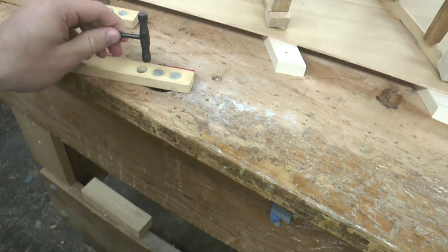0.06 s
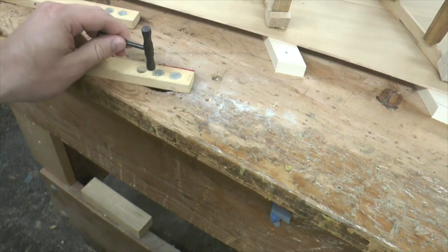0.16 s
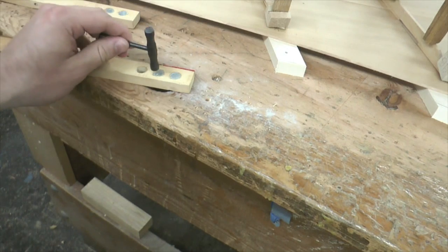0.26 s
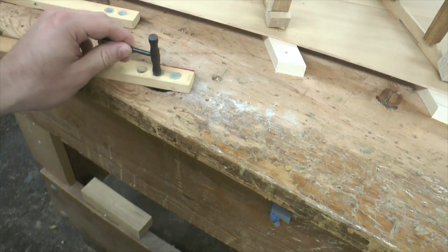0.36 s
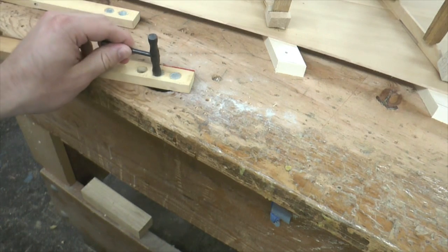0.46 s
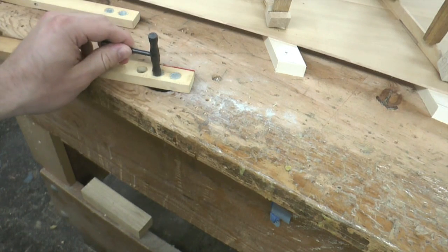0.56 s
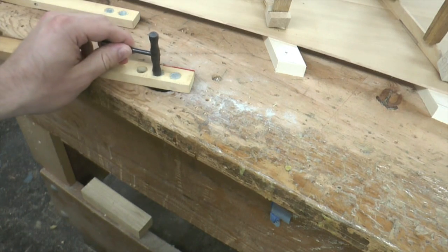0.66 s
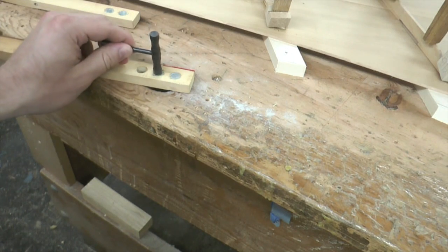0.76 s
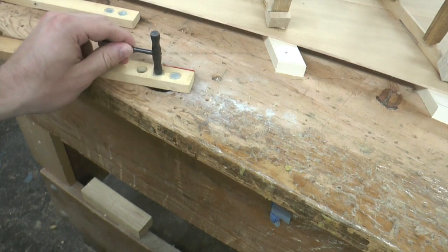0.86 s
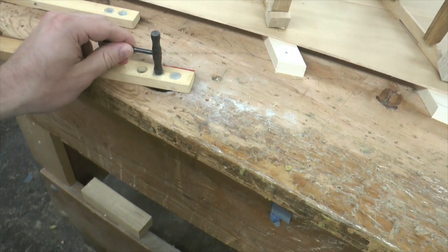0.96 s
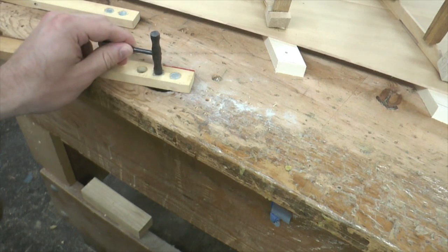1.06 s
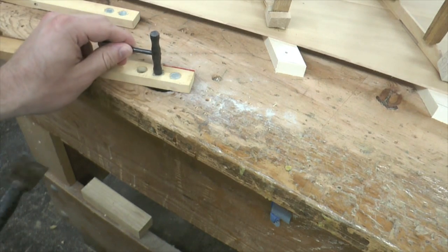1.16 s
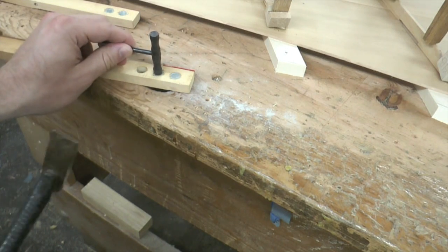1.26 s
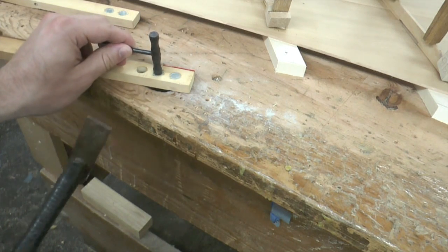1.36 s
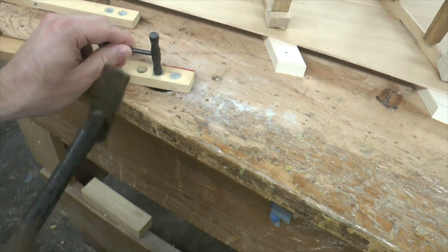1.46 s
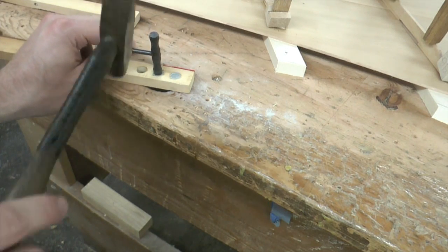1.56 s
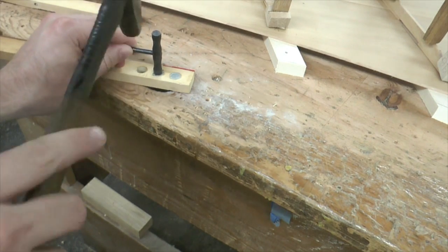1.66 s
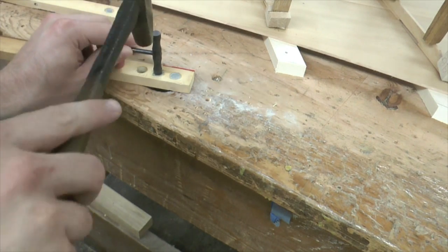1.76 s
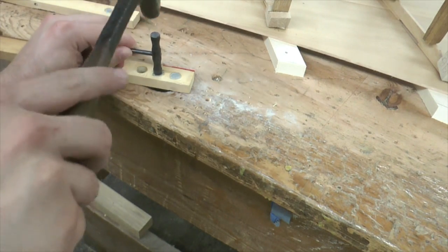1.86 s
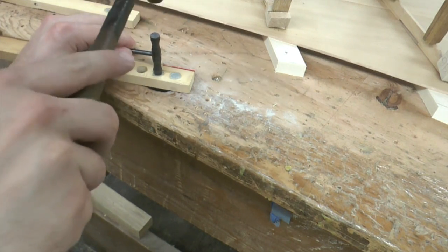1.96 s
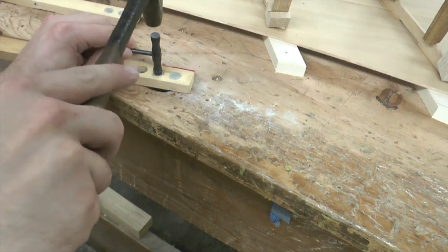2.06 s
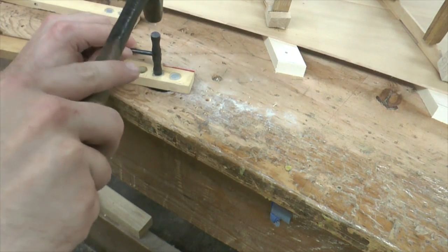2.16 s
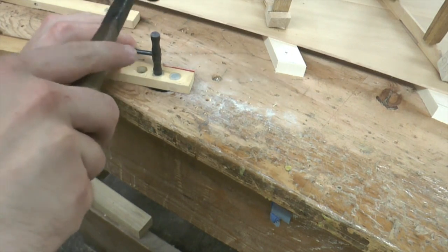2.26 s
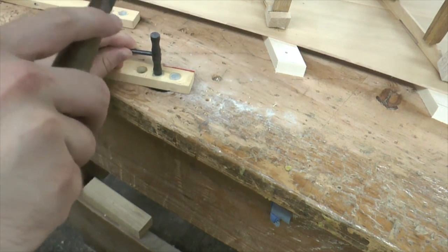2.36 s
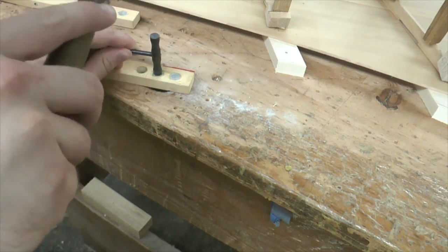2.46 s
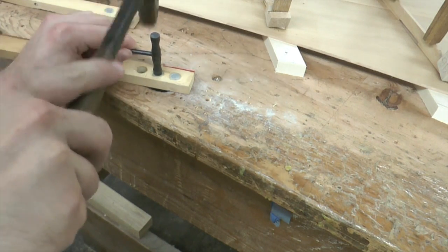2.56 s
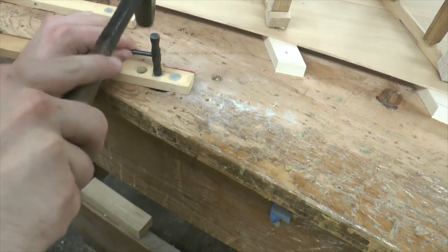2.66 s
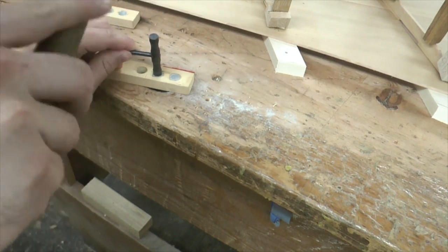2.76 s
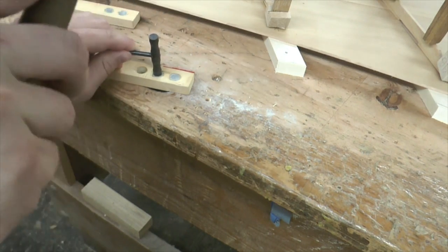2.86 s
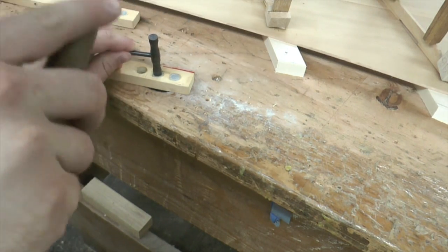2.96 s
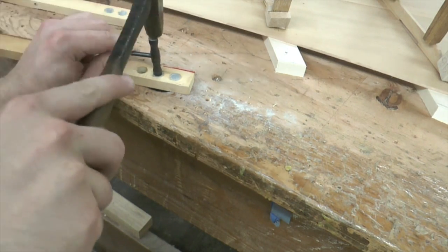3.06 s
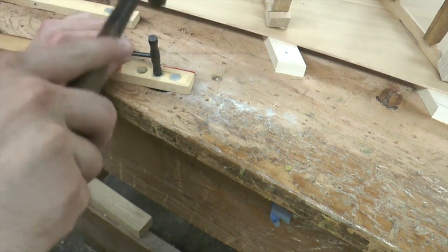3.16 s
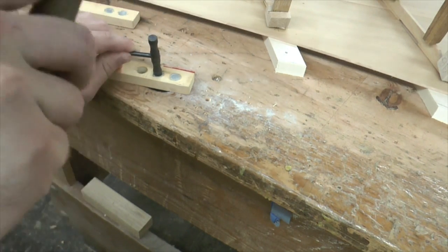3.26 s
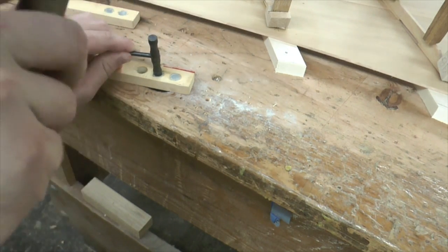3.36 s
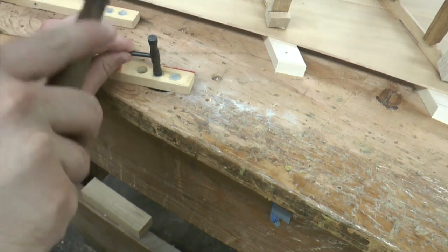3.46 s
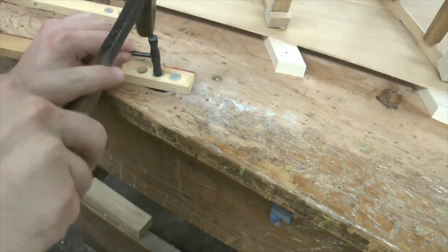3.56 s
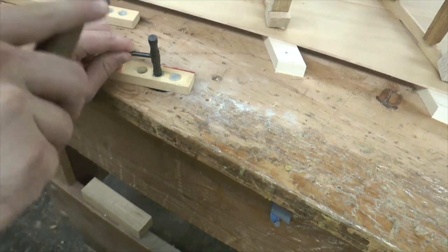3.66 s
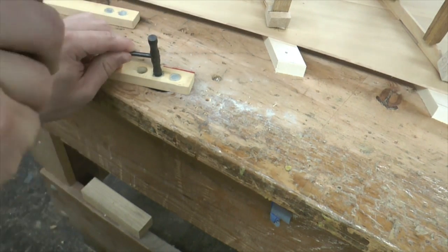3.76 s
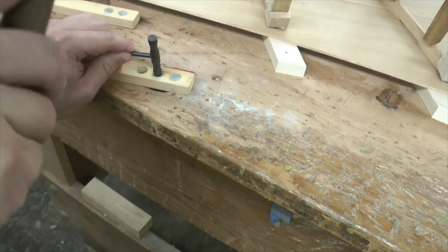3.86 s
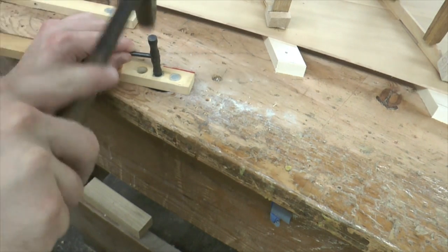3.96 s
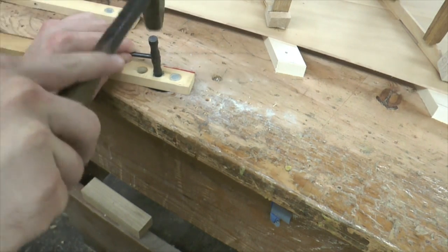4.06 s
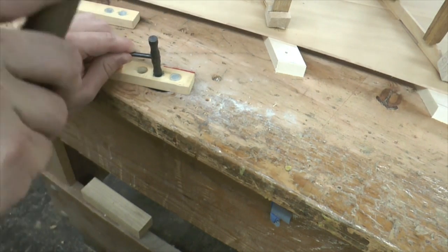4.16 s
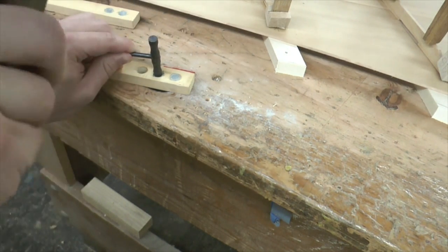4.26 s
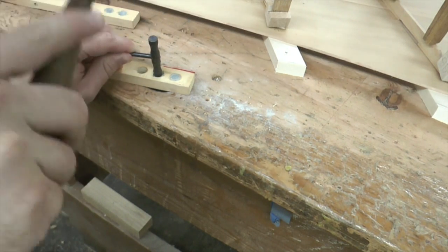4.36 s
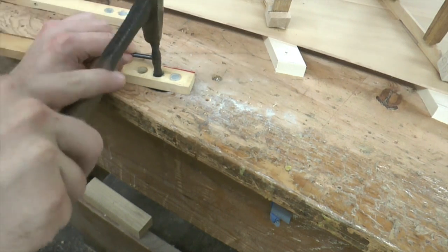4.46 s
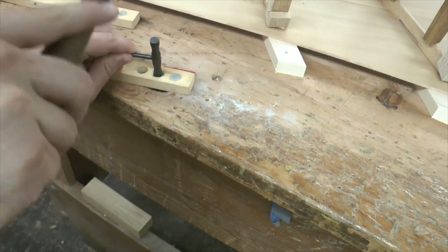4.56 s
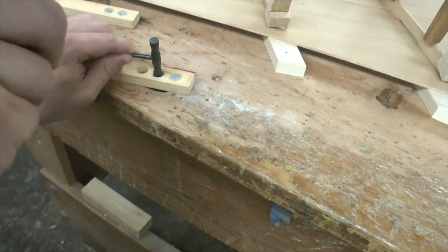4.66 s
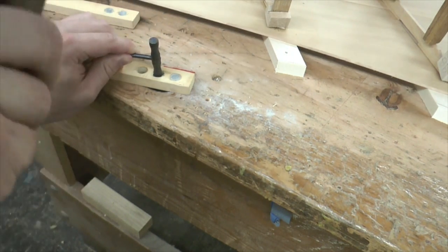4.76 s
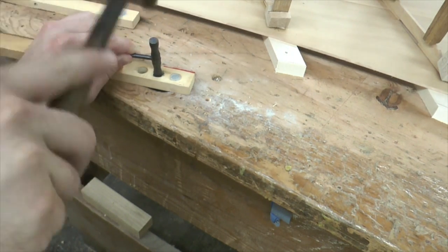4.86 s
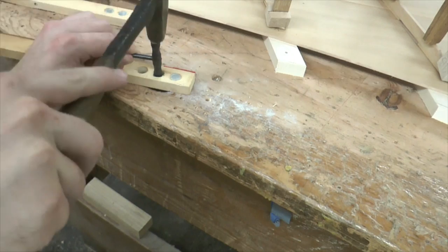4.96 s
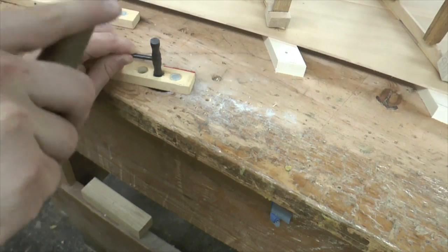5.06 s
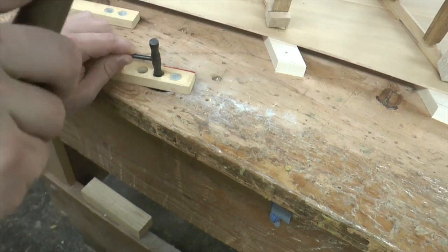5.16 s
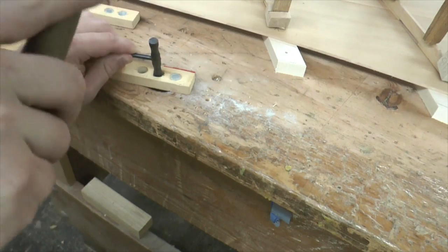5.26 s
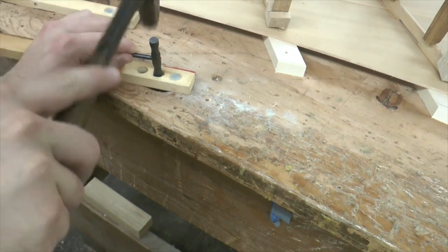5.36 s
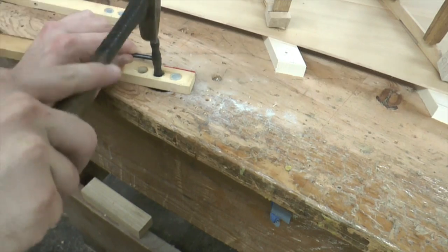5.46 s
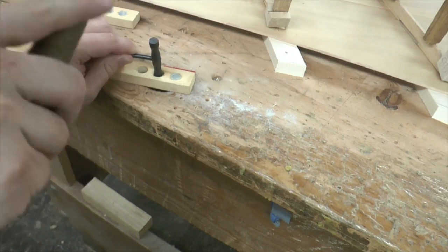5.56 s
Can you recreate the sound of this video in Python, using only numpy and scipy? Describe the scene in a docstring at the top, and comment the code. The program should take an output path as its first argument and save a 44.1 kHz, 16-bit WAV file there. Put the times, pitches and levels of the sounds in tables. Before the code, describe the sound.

Quiet handling comes first: small steel clicks, taps on wood and fingers sliding on a tool handle, above a faint electrical hum and hiss. Then come seven loud, steady hammer strikes on a metal punch held against wood on a bench. The first ones thud more and the later ones ring brighter. Each echoes in the small room and distorts the nearby microphone a little.

```python
"""In a small workshop, a steel punch is set on a lead weight in a wooden key and hammered seven times.
Light ticks, taps and rubs of handling come first, over faint mains hum and hiss. Each impact cracks,
excites the damped modes of punch, key and bench, and leaves the room ringing with standing waves
and diffuse reflections. The blows overload the close two-port camera microphone."""
import sys
import numpy as np
from scipy import signal
from scipy.fft import rfft, irfft
from scipy.io import wavfile
from scipy.ndimage import uniform_filter1d

SR = 44100
rng = np.random.default_rng(int(sys.argv[2]) if len(sys.argv) > 2 else 0)


def dump_mix(stems):
    """Bounce the given channels to the path in sys.argv[1] as a 16-bit WAV at rate SR."""
    frames = np.atleast_2d(stems).T  # one column per channel
    limited = np.clip(frames, -1, 1)  # hard clip at full scale
    pcm = np.round(limited * 32767).astype(np.int16)
    wavfile.write(sys.argv[1], SR, pcm)


N = 247842

# likeness of the two microphone ports in diffuse sound: frequency_hz, coherence
PORT_COHERENCE = [(100, 1), (1300, 1), (3100, 0.68), (6800, 0.5), (13000, 0)]
RIGHT_DB = -7  # gain of the whole right channel


def amp(db):
    """Amplitude ratio of a level in decibels."""
    return 10 ** (np.asarray(db) / 20)


def unit_rms(x):
    """Normalisation to an rms of 1."""
    return x / np.sqrt(np.mean(x ** 2) + 1e-20)


def curve_at(points, hz):
    """Interpolation of a table on a log-frequency axis."""
    table_hz, value = np.transpose(points)
    return np.interp(np.log(hz + 1), np.log(table_hz), value)


def bell(hz, centre_hz, octaves):
    """A Gaussian band on a log-frequency axis."""
    return np.exp(-.5 * (np.log2((hz + 1) / centre_hz) / octaves) ** 2)


def decay(t, t60_s):
    """Exponential damping: 60 dB lost in t60_s."""
    return np.exp(-np.log(1000) * t / t60_s)


def add(mix, start_s, sound):
    """Superposition of a sound on the two-channel mix."""
    part = mix[:, max(round(start_s * SR), 0):][:, :sound.shape[-1]]
    part += sound[..., :part.shape[1]]


def noise(length, gain, coherence=PORT_COHERENCE):
    """Partially coherent noise at the two ports, with spectrum gain(hz) and rms 1."""
    hz = np.fft.rfftfreq(length, 1 / SR)
    left, unrelated = rfft(rng.standard_normal((2, length)))
    alike = np.clip(curve_at(coherence, hz), -1, 1)
    right = alike * left + np.sqrt(1 - alike ** 2) * unrelated
    return unit_rms(irfft(np.array([left, right]) * gain(hz), length))


def minimum_phase(gain_db, size=4096):
    """The most compact causal pulse with spectrum gain_db(hz), by folding the cepstrum."""
    cepstrum = irfft(np.log(amp(gain_db(np.fft.rfftfreq(size, 1 / SR)))))
    cepstrum[1:size // 2] *= 2
    cepstrum[size // 2 + 1:] = 0
    return irfft(np.exp(rfft(cepstrum)))[:size // 2]


def ring(modes, t):
    """Free vibration as a sum of damped modes, neighbours in opposite phase."""
    return sum((-1) ** k * amp(db) * np.sin(2 * np.pi * hz * t) * decay(t, t60_s)
               for k, (hz, db, t60_s) in enumerate(modes))


def hiss(level_db=-66.5):
    """Stationary noise of still air and the microphone."""
    # noise floor spectrum: frequency_hz, relative_db
    spectrum = [(25, -12.5), (60, -23.5), (100, -8.5), (200, -7), (290, -8.5), (380, -3.5), (480, -10.5),
                (800, -12), (1280, -14), (2400, -15.5), (3100, -15.5), (4400, -18), (8000, -22.5),
                (16000, -27.5)]
    # likeness of the ports in that noise: frequency_hz, coherence
    coherence = [(60, .85), (600, .87), (1400, -0.084), (3100, -0.14), (7000, -0.21)]
    return amp(level_db) * noise(N, lambda hz: amp(curve_at(spectrum, hz)), coherence)


def hum(mains_hz=59.98, mains_db=-78, buzz_db=-80, db_per_octave=-2.5, whine_hz=960, waver_rad=0.16):
    """Mains hum and its even harmonics, wavering in phase, with one standing out as a whine."""
    # multiples of the mains in the buzz: harmonic_number
    harmonics = [12, 14, 16, 18, 28, 34, 46, 50, 54, 60, 74]
    t = np.arange(N) / SR
    knots_s = np.linspace(0, t[-1], num=N // 4096)
    lines_hz = mains_hz * np.array(harmonics)
    whine_db = 12 * bell(lines_hz, whine_hz, octaves=0.079)
    lines_db = buzz_db + db_per_octave * np.log2(lines_hz / whine_hz) + whine_db
    out = np.zeros(N)
    for hz, db in [(mains_hz, mains_db), *zip(lines_hz, lines_db)]:
        phase = np.interp(t, knots_s, waver_rad * rng.standard_normal(len(knots_s)))
        out += amp(db) * np.sqrt(2) * np.sin(2 * np.pi * hz * t + phase)
    return out


def reflections(size=512):
    """Diffuse reverberation: dense random echoes whose treble is absorbed soonest."""
    # spectrum of the diffuse field: frequency_hz, relative_db
    spectrum = [(50, -15), (100, 0), (200, 3), (350, 11), (550, 5.5), (850, 2), (1250, 5), (1900, -1),
                (2500, -5.5), (3100, -7), (3950, -10), (5600, -8.5), (9000, -12), (15000, -25.5)]
    # resonances of hammer and punch that linger in it: centre_hz, width_octaves, boost_db
    steel_resonances = [(1830, 0.072, 4), (3373, 0.065, 3.5)]
    # reverberation time: frequency_hz, t60_s
    reverb_times = [(100, 1.3), (300, 0.98), (800, 0.94), (1800, 0.96), (4000, 0.87), (7000, 0.74),
                    (11000, 0.55), (15000, 0.38)]

    def colour(hz):
        steel_db = sum(db * bell(hz, centre, octaves) for centre, octaves, db in steel_resonances)
        return amp(curve_at(spectrum, hz) + steel_db)

    hz, times, bands = signal.stft(noise(SR, colour), SR, nperseg=size)
    bands = bands * decay(times, curve_at(reverb_times, hz)[:, None])
    return signal.istft(bands, SR, nperseg=size)[1][:, :SR]


def room_response(walls, diffuse_db=-30, early_db=3, early_s=0.061, build_s=0.0024, standing_db=-1.0):
    """The workshop's impulse response: standing waves plus reflections, strongest at first."""
    # standing waves: pitch_hz, level_db, t60_s
    room_modes = [(83.8, -54.5, 4.1), (93.95, -61, 2.5), (140.1, -49, 1.4), (167.9, -47.5, 1.2),
                  (240.8, -40.5, 0.85), (266, -36.5, 0.7), (296.3, -36, 0.72), (299, -44, 0.25),
                  (313, -35, 0.62), (330.8, -42, 1.2), (357.6, -34, 0.97), (384, -39.5, 0.93),
                  (415, -38.5, 1), (450, -36.5, 0.92), (456, -34, 0.55), (553, -44.5, 0.35),
                  (571, -37.5, 0.7), (611.4, -35.5, 0.4), (618, -35, 0.76), (652, -44.5, 1.2),
                  (715, -45, 0.83), (743, -43, 0.39), (889, -44, 0.81), (869.7, -38, 0.55),
                  (1058, -40, 0.56), (1196, -44.5, .85), (1185, -46.5, 1.4), (1544, -45, 0.39),
                  (1750, -38.5, 0.3), (2008, -46, 0.78)]
    t = np.arange(SR) / SR
    fresh_share = .12  # the hands move, so this share of the reflected energy is new each time
    tail = np.sqrt(1 - fresh_share) * walls + np.sqrt(fresh_share) * reflections()
    diffuse = tail * amp(diffuse_db + early_db * np.exp(-t / early_s))
    build_up = 1 - np.exp(-(t / build_s) ** 2)
    return (diffuse + amp(standing_db) * ring(room_modes, t)) * build_up


def tick(centre_hz, octaves, t60_s):
    """A light impact: one band of noise, exponentially damped."""
    t = np.arange(SR // 4) / SR
    return noise(len(t), lambda hz: bell(hz, centre_hz, octaves)) * decay(t, t60_s)


def rub(length_s, centre_hz, octaves, grain_db=3):
    """Stick-slip friction: a swell of noise that flickers as skin catches and lets go."""
    t = np.arange(SR // 4) / SR
    swell = np.sin(np.pi * np.minimum(t / length_s, 1))
    grain = unit_rms(uniform_filter1d(rng.standard_normal(len(t)), size=120))
    return noise(len(t), lambda hz: bell(hz, centre_hz, octaves)) * swell * amp(grain_db * grain)


def handling(room, wet_db=-14, thump_wet_db=-22, tail_s=0.066, right_trim_db=-2.5):
    """Weak impacts and friction as the punch is seated, convolved with a shortened room response."""
    # steel ticks as the punch is placed and the hammer taken up: start_s, level_db, centre_hz
    steel_ticks = [(.198, -47.5, 7000), (.2051, -40.5, 6250), (.2997, -43, 5430), (.3025, -47.5, 2970),
                   (.538, -54, 3700), (1.997, -35.5, 7040), (2.0058, -39, 8500), (2.0624, -37, 3350),
                   (2.168, -54.5, 3400)]
    # taps on the wooden key: start_s, level_db
    key_taps = [(0.1762, -49), (1.703, -53), (2.062, -39.5), (2.096, -55.5)]
    # soft thumps on the bench top: start_s, level_db
    bench_thumps = [(.5435, -42.5), (1.281, -61), (2.064, -77)]
    # resonances a thump excites: centre_hz, width_octaves, relative_db, t60_s
    thump_bands = [(268, 0.76, 2, 0.18), (717, .33, -1.5, 0.19)]
    # skin sliding on a handle: start_s, length_s, level_db, centre_hz, width_octaves
    rubs = [(0.032, 0.18, -67, 960, 0.92), (1.235, 0.063, -67.5, 2500, 1.2), (1.749, 0.072, -60, 690, 1.8),
            (1.904, 0.15, -64.5, 600, 1.6)]
    touches, thumps = np.zeros((2, N)), np.zeros((2, N))
    for start_s, db, hz in steel_ticks:
        add(touches, start_s, amp(db) * tick(hz, octaves=0.85, t60_s=0.016))
    for start_s, db in key_taps:
        add(touches, start_s, amp(db) * tick(centre_hz=1390, octaves=0.26, t60_s=0.018))
    for start_s, db in bench_thumps:
        for hz, octaves, band_db, t60_s in thump_bands:
            add(thumps, start_s, amp(db + band_db) * tick(hz, octaves, t60_s))
    for start_s, length_s, db, hz, octaves in rubs:
        add(touches, start_s, amp(db) * rub(length_s, hz, octaves))
    short_room = room * np.exp(-np.arange(SR) / SR / tail_s)  # light touches have only a short echo
    into_room = amp(wet_db) * touches + amp(thump_wet_db) * thumps
    echo = signal.fftconvolve(into_room, short_room, axes=1)[:, :N]
    return (touches + thumps + echo) * amp([[0], [right_trim_db]])


def crack(peak_db=-2, swell_s=0.0007, scatter_db=-24, scatter_s=0.0078):
    """The impact transient of steel on steel, then its scattering off hand and bench top."""
    # spectrum of the transient: frequency_hz, relative_db
    spectrum = [(200, -4.5), (1000, 4), (3000, 4), (4100, 3), (6000, 10.5), (8200, -2.5), (10000, -1),
                (13500, -5), (15000, 2.5), (16000, -8)]
    t = np.arange(SR) / SR
    impact = amp(peak_db) * t / swell_s * np.exp(1 - t / swell_s)
    scatter = amp(scatter_db) * np.exp(-t / scatter_s)
    burst = noise(SR, lambda hz: amp(curve_at(spectrum, hz)), coherence=[(1000, 0.73), (12000, 0.91)])
    return (impact + scatter) * burst


def contact_db(hz, force_db, looseness, wood_hz, clack_db, ping_hz, overtone_db):
    """Excitation spectrum of a blow: a tight weight thuds, a loose one lets the punch ring brighter."""
    # bands set by the weight's seating: centre_hz, width_octaves, tight_db, loose_db
    seating_bands = [(399, .4, 2, -9), (1800, 0.19, -0.5, 3), (9000, 0.71, -6, -0.5)]
    seating = sum((tight_db + looseness * (loose_db - tight_db)) * bell(hz, centre, octaves)
                  for centre, octaves, tight_db, loose_db in seating_bands)
    key_note = 4.5 * bell(hz, wood_hz, octaves=.14)
    key_clack = clack_db * bell(hz, centre_hz=3100, octaves=0.27)
    steel_ping = 7 * bell(hz, ping_hz, octaves=0.096)
    overtone = overtone_db * bell(hz, 1.38 * ping_hz, octaves=0.096)
    return force_db + seating + key_note + key_clack + steel_ping + overtone


def blow(room, stroke, direct_depth=0.93, room_db=1.0):
    """Source and filter: the contact colours the room's ring and, more weakly, the direct knock."""
    # punch, key and bench top vibrating together: pitch_hz, level_db, t60_s
    bench_modes = [(269, -14.5, 0.047), (357, -15.5, .03), (461, -24, 0.095), (642, -23.5, 0.038),
                   (797, -17, 0.024), (1161.5, -11.5, 0.042), (1362, -19, 0.051), (1700, -20.5, 0.012),
                   (1968, -21, 0.058), (2405, -12, 0.015), (3170, -19.5, 0.026), (3520, -11, 0.018),
                   (5840, -6, 0.0063), (8360, -5.5, 0.0073)]
    # direct sound at the right port against the left: frequency_hz, relative_db
    right_port = [(60, -10.5), (300, -9), (2000, -8), (4000, -12.5), (6500, -11), (8200, 0), (11000, -16),
                  (15000, -2.5)]
    left, right = crack() + ring(bench_modes, np.arange(SR) / SR)
    port_filter = minimum_phase(lambda hz: curve_at(right_port, hz) - RIGHT_DB)
    right = signal.fftconvolve(right, port_filter)[:SR]
    direct_filter = minimum_phase(lambda hz: direct_depth * contact_db(hz, *stroke))
    room_filter = minimum_phase(lambda hz: contact_db(hz, *stroke))
    direct = signal.fftconvolve(np.array([left, right]), direct_filter[None], axes=1)
    return direct + amp(room_db) * signal.fftconvolve(room, room_filter[None], axes=1)


def hammering(walls):
    """Repeated impacts on one spot, so the echo paths are nearly the same for each."""
    # hammer blows: start_s, force_db, looseness (0-1), wood_hz, clack_db, ping_hz, overtone_db
    blows = [(2.7314, 1, 0, 569, 3, 9250, 5), (3.2120, 2, 0.05, 558, 2.5, 7820, 8),
             (3.6695, 2.5, 0.24, 548, 1, 7900, -6.5), (4.1305, 3, 0.62, 720, -1.5, 6420, 1),
             (4.568, 2.5, 0.98, 578, -2, 5930, 0.5), (5.0434, 2.5, 0.76, 735, -2, 5730, 2.5),
             (5.5371, 1.5, 0.65, 427, 4, 7180, 2.5)]
    # the punch chattering under the hammer after some blows: start_s, level_db
    chatter = [(3.2464, -16), (4.1488, -17.5), (4.582, -21.5), (5.069, -16.5), (5.56, -21)]
    out = np.zeros((2, N))
    for start_s, *stroke in blows:
        add(out, start_s, blow(room_response(walls), stroke))
    for start_s, db in chatter:
        add(out, start_s, amp(db) * tick(centre_hz=6000, octaves=0.6, t60_s=0.0018))
    return out


def scene():
    """Superposition of the bench work and the background, louder on the left."""
    walls = reflections()
    mix = hammering(walls) + handling(room_response(walls)) + hum() + hiss()
    return mix * amp([[0], [RIGHT_DB]])


def record(dry, ceiling=0.33, sag=0.00083, sag_s=0.059, duck_db=3, attack_s=0.0016, release_s=0.081):
    """Saturation: each crack clips, ducks the gain and shifts the bias; filters then dull the top."""
    clipped = dry / (1 + (dry / ceiling) ** 6) ** (1 / 6)
    overload = np.tanh(abs(dry - clipped) / ceiling).mean(0)
    held = signal.lfilter([1 / (attack_s * SR)], [1, -np.exp(-1 / (release_s * SR))], overload)
    ducked = clipped * amp(-duck_db * np.tanh(held))  # the gain recovers while the room rings
    bias = signal.lfilter([sag], [1, -np.exp(-1 / (sag_s * SR))], overload)
    dc_block = signal.butter(1, 1.0, "high", fs=SR)
    centred = signal.lfilter(*dc_block, ducked - bias)
    treble_dip = minimum_phase(lambda hz: -2 * bell(hz, centre_hz=15400, octaves=0.7))
    dulled = signal.oaconvolve(centred, treble_dip[None])[:, :N]
    band_limit = signal.firwin(161, cutoff=16000, window=("kaiser", 9), fs=SR)
    return signal.oaconvolve(dulled, band_limit[None], "same")


dry = scene()
out = record(dry)
dump_mix(out)
```